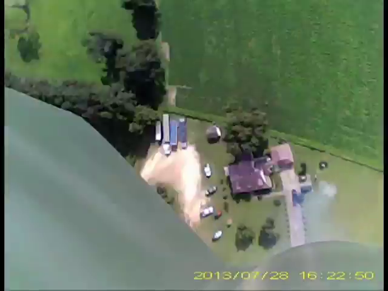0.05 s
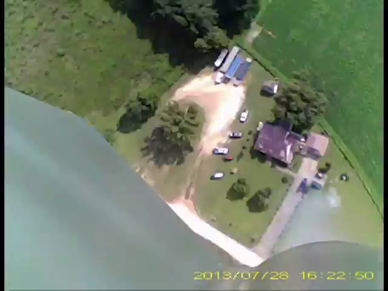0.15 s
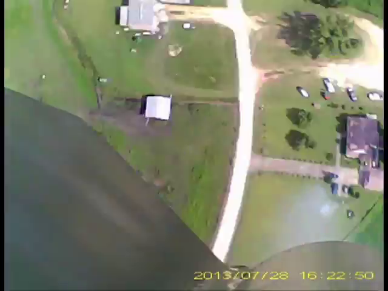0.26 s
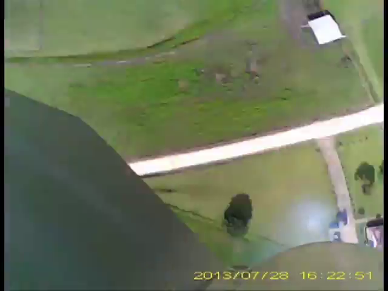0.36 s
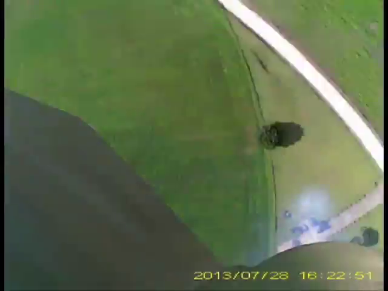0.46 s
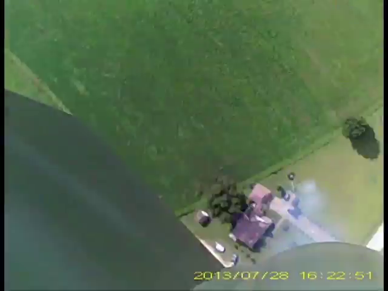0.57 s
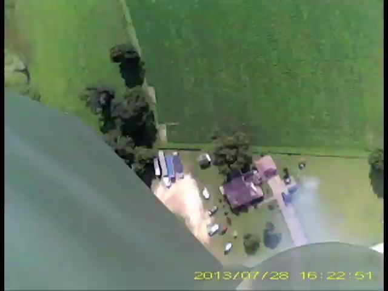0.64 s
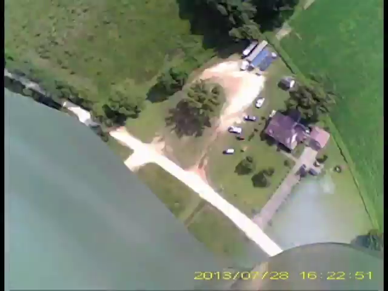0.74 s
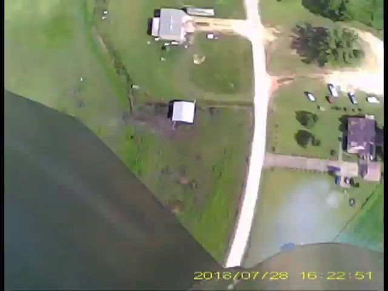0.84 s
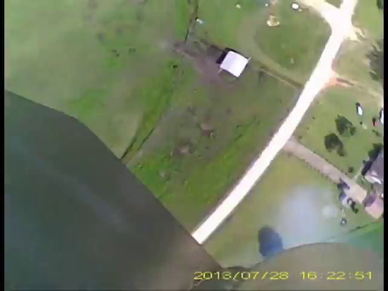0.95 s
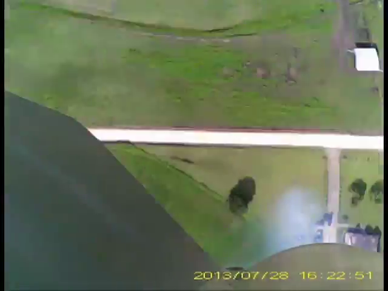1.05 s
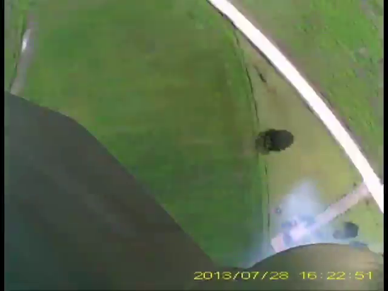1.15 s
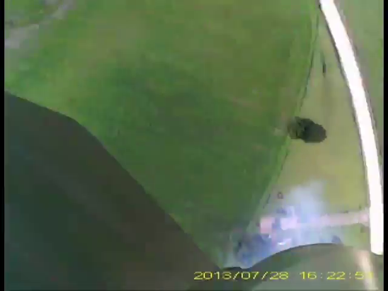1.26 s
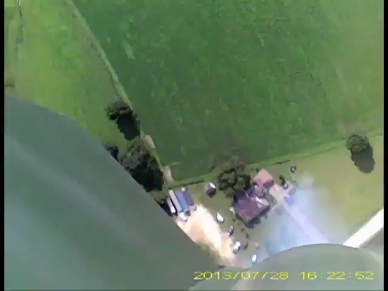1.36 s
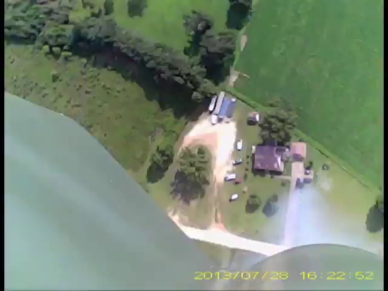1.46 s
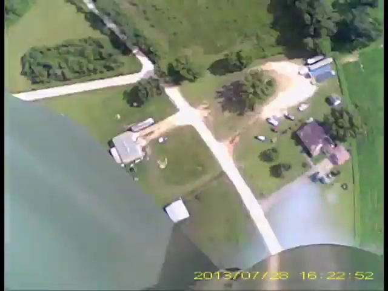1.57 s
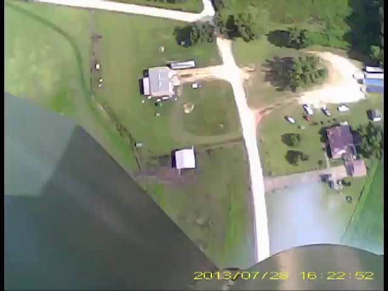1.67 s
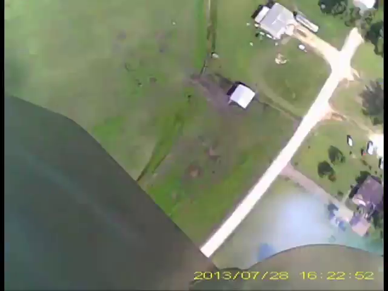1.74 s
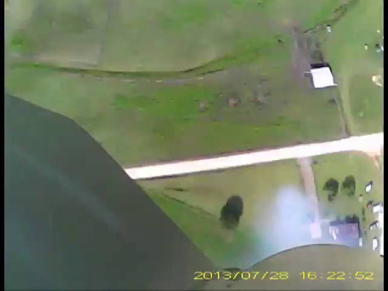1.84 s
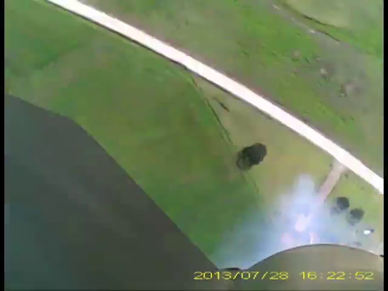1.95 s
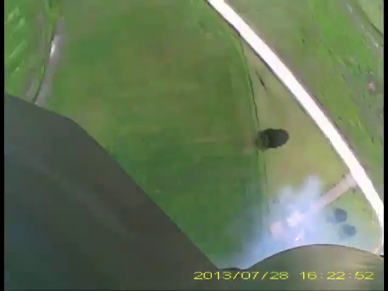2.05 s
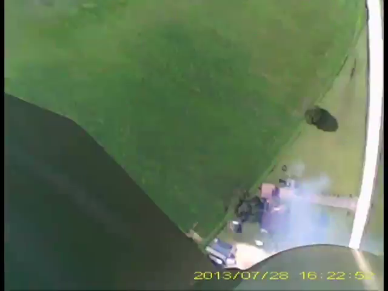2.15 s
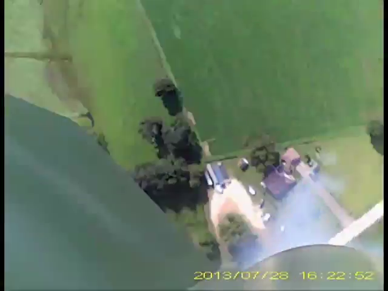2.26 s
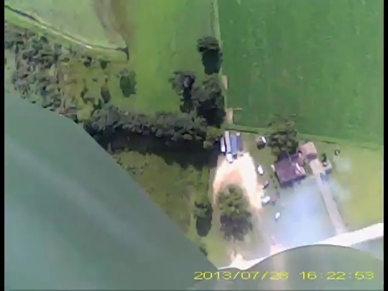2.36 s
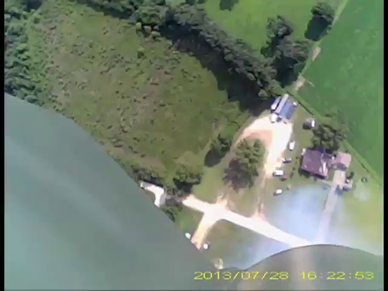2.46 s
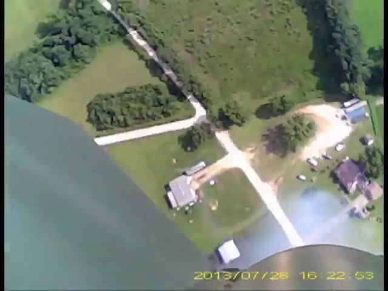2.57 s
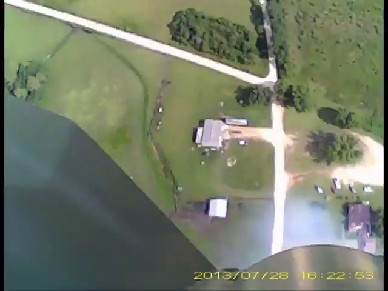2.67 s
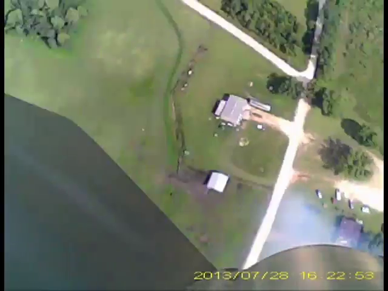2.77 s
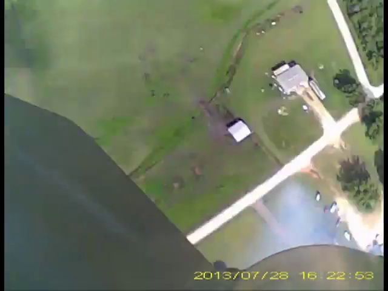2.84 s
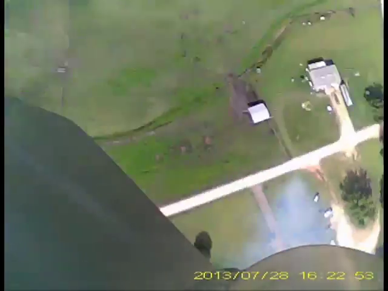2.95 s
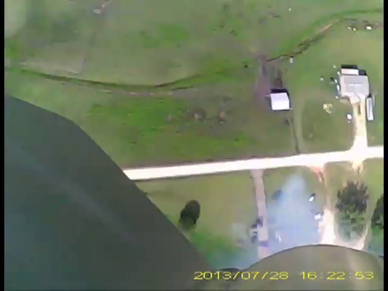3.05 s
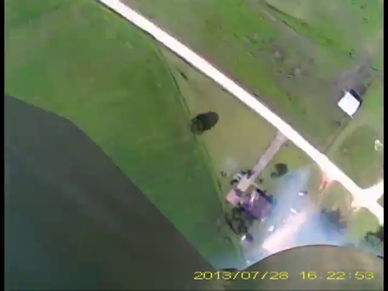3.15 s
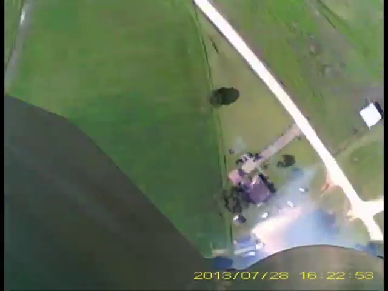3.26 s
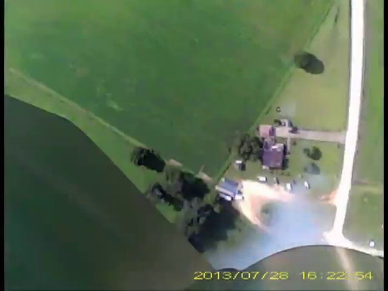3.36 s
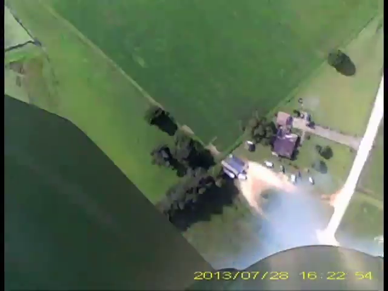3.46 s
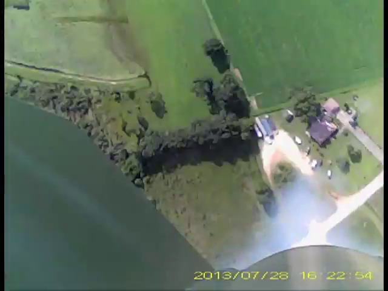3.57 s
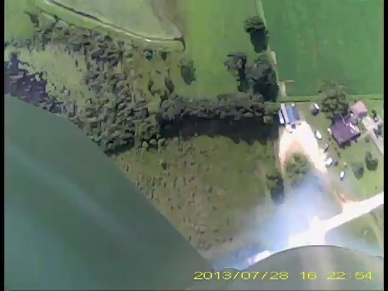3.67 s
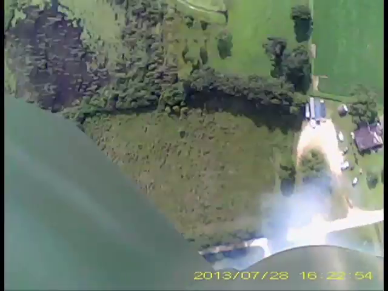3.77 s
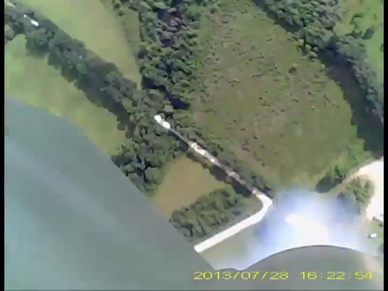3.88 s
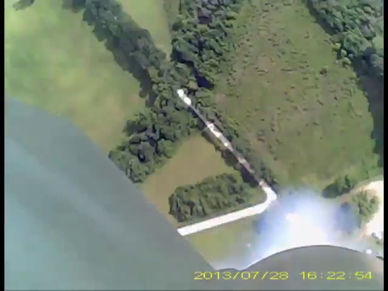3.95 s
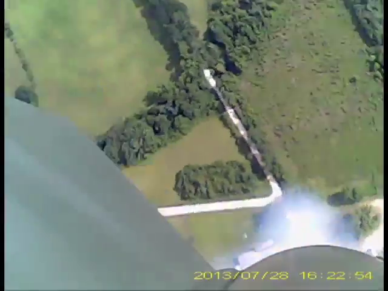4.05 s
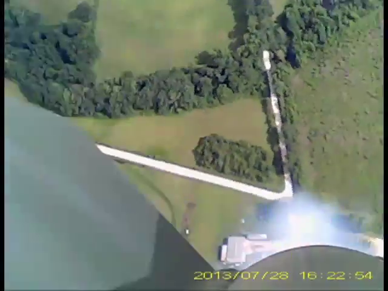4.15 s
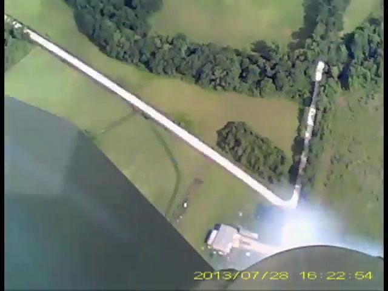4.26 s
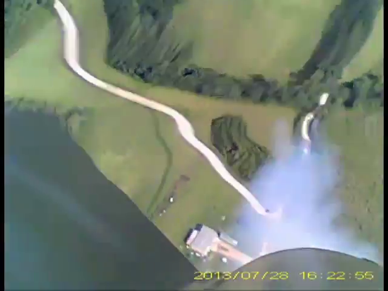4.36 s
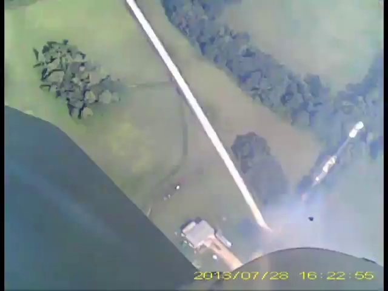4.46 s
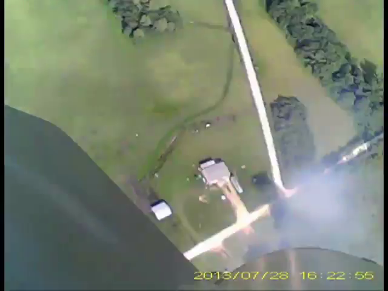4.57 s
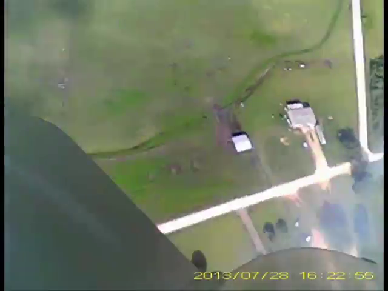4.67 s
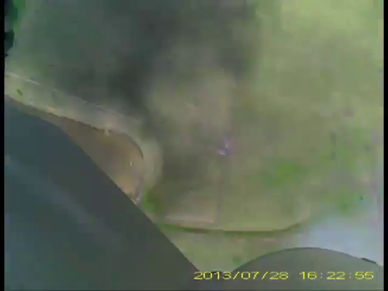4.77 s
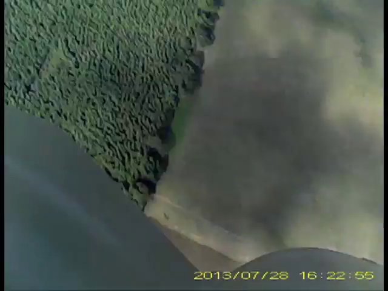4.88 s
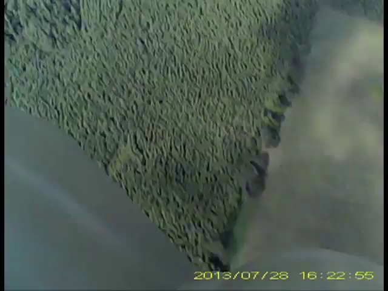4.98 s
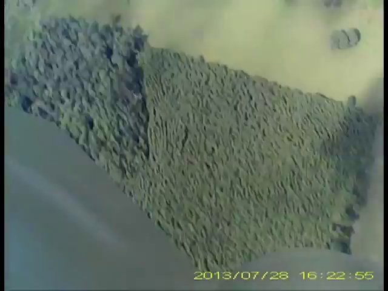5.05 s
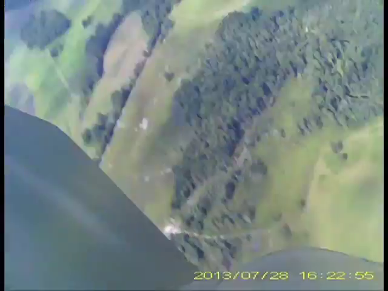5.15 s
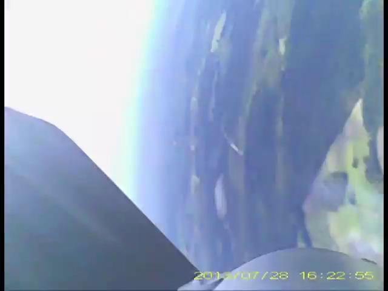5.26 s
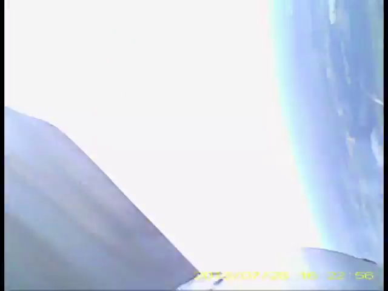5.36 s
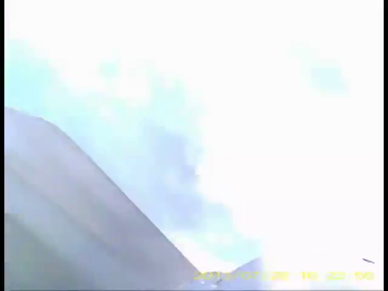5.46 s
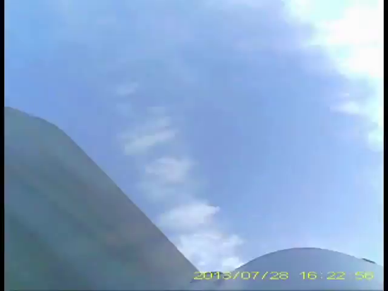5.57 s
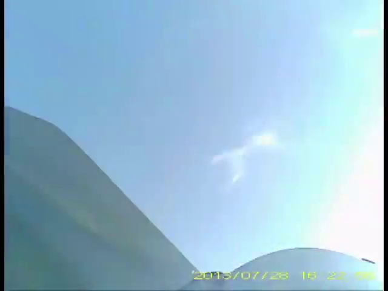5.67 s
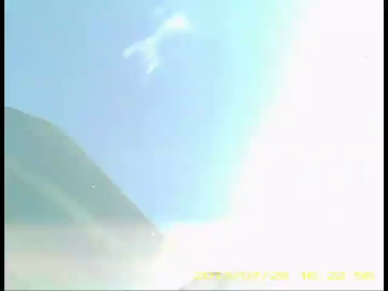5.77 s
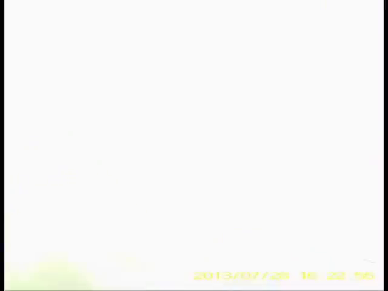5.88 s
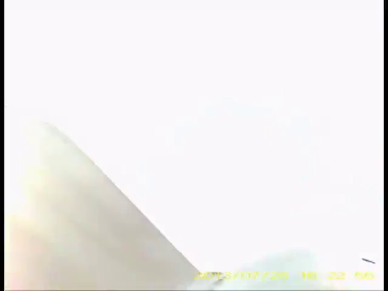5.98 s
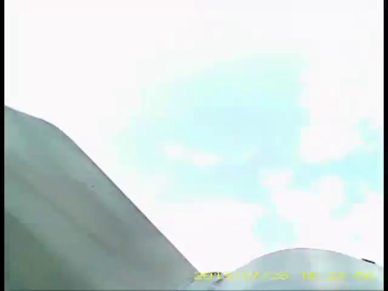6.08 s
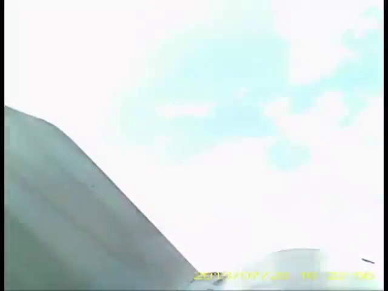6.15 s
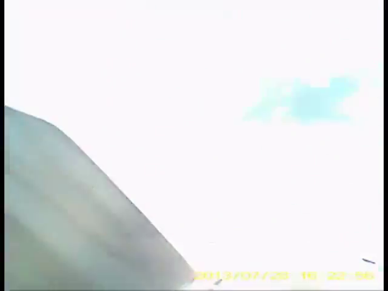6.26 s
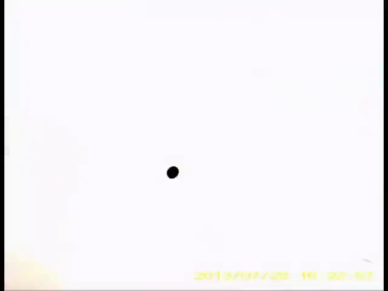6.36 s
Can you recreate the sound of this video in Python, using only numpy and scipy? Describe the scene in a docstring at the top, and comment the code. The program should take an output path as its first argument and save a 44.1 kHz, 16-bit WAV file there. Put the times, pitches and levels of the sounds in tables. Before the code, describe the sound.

A harsh, steady rush of wind overloads a tiny microphone riding a model rocket through open air, with low buffeting and a hollow whoosh that sinks as the rocket slows. The rush turns choppy, with short surges and several thumps. Near the end it falls to faint puffs of wind, leaving brief close rattles from the housing and one bright click.

```python
"""On the side of a climbing model rocket, turbulent air overloads a small camera's microphone.
Eddies behind the housing moan and whoosh, falling in pitch as the rocket slows, and the shell buzzes
faintly. As the rocket tips over, the rush breaks into gusts and thumps, the housing rattles in its
resonant modes, and something loose flicks the microphone port."""
import sys
import numpy as np
from scipy import signal
from scipy.fft import rfft, irfft
from scipy.io import wavfile
from scipy.ndimage import uniform_filter1d

SR = 44100
rng = np.random.default_rng(int(sys.argv[2]) if len(sys.argv) > 2 else 0)


def to_wav(sig):
    """Store sig (one row per channel, or 1-D mono) as 16-bit WAV at the path in sys.argv[1].

    Samples outside -1..1 are clipped; the rate is SR.
    """
    pcm = np.clip(np.atleast_2d(sig), -1, 1) * 32767
    pcm = np.round(pcm).astype(np.int16)
    wavfile.write(sys.argv[1], SR, pcm.T)  # frames by channels


N = 283122


def gain_of(db):
    """The decibel law: 20 dB is a factor of ten in amplitude."""
    return 10 ** (np.asarray(db) / 20)


def unit_rms(x):
    """Normalisation to a mean power of one."""
    return x / np.sqrt(np.mean(x ** 2) + 1e-20)


def spectrum_db(points, hz):
    """Interpolation of a spectrum along a logarithmic frequency axis."""
    point_hz, db = np.transpose(points)
    return np.interp(np.log(hz + 1), np.log(point_hz + 1), db)


def curves(rows):
    """Linear interpolation in time: one curve for each column after the first."""
    times, *columns = np.transpose(rows)
    return [np.interp(np.arange(N) / SR, times, column) for column in columns]


def swell(seconds, rise):
    """A skewed half-sine envelope; rise is the share of its length spent rising."""
    progress = np.arange(0, 1, 1 / (max(seconds, .002) * SR))
    return np.sin(np.pi * np.interp(progress, [0, rise, 1], [0, .5, 1]))


def add(mix, start_s, sound):
    """Superposition: a sound adds to the mix from its start time on."""
    part = mix[round(start_s * SR):][:len(sound)]
    part += sound[:len(part)]


def bumps(rows, rise):
    """Level modulation in dB: zero but for one swell a row."""
    out = np.zeros(N)
    for start_s, rise_db, seconds in rows:
        add(out, start_s, rise_db * swell(seconds, rise))
    return out


def flutter(top_hz):
    """Random modulation: band-limited noise of unit RMS, from 3 Hz to about top_hz."""
    hz = np.fft.rfftfreq(N, 1 / SR)
    band = 1 / ((1 + (hz / top_hz) ** 4) * (1 + (3 / (hz + 1e-3)) ** 4))
    noise = rng.standard_normal(len(hz)) + 1j * rng.standard_normal(len(hz))
    return unit_rms(irfft(band * noise, N))


def resonate(x, hz, width_hz):
    """Resonance by heterodyning: shift hz, steady or sliding, to zero, smooth, and shift back."""
    carrier = np.exp(2j * np.pi * np.cumsum(hz * np.ones(len(x))) / SR)
    pole = np.exp(-np.pi * width_hz / SR)
    return 2 * (carrier * signal.lfilter([1 - pole], [1, -pole], x / carrier + 1e-18)).real


def flight():
    """Eddy shedding follows airspeed: it slows with the rocket and quickens as it tips across the wind."""
    # Each row: time in seconds, shedding frequency in Hz, whoosh level in dB.
    shedding = [(0, 172.7, -22), (1.4, 164, -3), (2.6, 128, -1), (4, 79, -5), (4.3, 73, -13),
                (4.55, 68.6, -12), (4.65, 117, -8.5), (5.05, 105, -12.5), (5.12, 90, -60)]
    tip_start_s, tip_length_s = 4.55, .15
    hz, whoosh_db = curves(shedding)
    octaves_lost = np.log2(hz[0] / hz)
    tipped = np.clip((np.arange(N) / SR - tip_start_s) / tip_length_s, 0, 1)
    return hz, octaves_lost, whoosh_db, tipped


def turbulence(spectrum, size, tilt_db, patchy_db):
    """Turbulent pressure is random: patchy noise of steady power, tilted by tilt_db per octave."""
    hop = size // 4
    frames, hz = N // hop + 5, np.fft.rfftfreq(size, 1 / SR)
    real, imaginary, patches = rng.standard_normal((frames, len(hz), 3)).T
    patches = uniform_filter1d(patches, size=5, axis=0)  # across frequency
    patches = unit_rms(uniform_filter1d(patches, size=9, axis=1))  # across time
    tilt_db = np.pad(tilt_db[::hop], (0, 5), "edge")[:frames]
    shape = gain_of(spectrum_db(spectrum, hz)[:, None] + np.outer(np.log2((hz + 20) / 1000), tilt_db))
    shape /= np.linalg.norm(shape, axis=0)
    spectra = (real + 1j * imaginary) * shape * gain_of(patchy_db * patches)
    return unit_rms(signal.istft(spectra, nperseg=size, noverlap=size - hop)[1][:N])


def airflow():
    """Turbulence at the microphone port: a broad rush and a low buffeting, both modulated by gusts."""
    # Each row: time in seconds, rush level in dB, buffeting level in dB, rush tilt in dB per octave.
    air = [(0, 8.5, -0.5, 1.5), (1, 6.5, -3.5, 1), (2.6, 5.5, -7, .5), (3.6, 4.5, -7.5, 0),
           (4.2, 0, -5.5, 1), (4.33, -9, -3.5, 0.5), (4.58, -4, -4.5, -1), (4.75, -1, -17.5, -3),
           (5.085, -10.5, -14, -3), (5.1, -14.5, -7.5, -5.5), (5.19, -18.5, -14, -6),
           (5.25, -16, -19, -5.5), (5.34, -20.5, -14, -8), (5.41, -45.5, -28, -2), (5.72, -49, -32.5, -1),
           (5.86, -40.5, -33, 3.5), (5.93, -39, -45, 3.5), (6.08, -42.5, -51, -3.5), (6.19, -45, -35, -2.5),
           (6.3, -30.5, -26, -7.5), (6.42, -40, -22, 0)]
    # Spectra ahead of the amplifier. Each row: frequency in Hz, relative spectral density in dB.
    rush_spectrum = [(30, -43), (200, -16.5), (500, -1), (1000, -1.5), (1600, -2.5), (2000, -3),
                     (2400, -9.5), (3300, -16), (4200, -15.5), (4800, -25.5), (5500, -45.5), (7000, -33),
                     (11000, -37.5)]
    buffet_spectrum = [(10, -15.5), (40, 2), (100, 1.5), (250, 2), (450, -2), (800, -24), (2000, -35.5),
                       (11000, -103.5)]
    # Brief surges brighten the rush; later, slower puffs dull it.
    # Each row: start in seconds, rise of the rush in dB, length in seconds.
    surges = [(4.232, 10.5, 0.076), (4.344, 5.5, 0.026), (4.39, 2, 0.017), (4.427, 6.5, .022),
              (4.473, 4.5, 0.017), (4.914, 6, 0.014), (4.975, 8.5, .022), (5.015, 6.5, .018),
              (5.045, 2.5, 0.055), (5.107, 8, 0.018), (5.186, 8, 0.011), (5.232, 4.5, 0.043),
              (5.278, 6, 0.03), (5.333, 4, .018)]
    puffs = [(5.43, 10, 0.048), (5.54, 12.5, .11), (6.09, 11, 0.096)]
    rush_db, buffet_db, bright_db = curves(air)
    spread_db = np.where(np.arange(N) / SR > 4.5, 2, 0.23)  # steps up as the flight turns unsteady
    wobble_db = spread_db * flutter(top_hz=40)
    puffs_db = bumps(puffs, rise=0.48)
    gusts_db = wobble_db + bumps(surges, rise=0.46)
    lumps_db = 0.67 * wobble_db + 0.48 * spread_db * flutter(top_hz=30) + 0.82 * puffs_db
    _, octaves_lost, _, tipped = flight()
    rush_tilt = bright_db + 0.039 * gusts_db - 0.42 * puffs_db
    # The buffeting brightens as the eddies slow and turns dull once the rocket has tipped.
    buffet_tilt = (1 - tipped) * (4.5 * octaves_lost - 0.5) - 3 * tipped
    rush = turbulence(rush_spectrum, size=256, tilt_db=rush_tilt, patchy_db=-1.0)
    buffet = turbulence(buffet_spectrum, size=2048, tilt_db=buffet_tilt, patchy_db=1.5)
    return gain_of(rush_db + gusts_db + puffs_db) * rush + gain_of(buffet_db + lumps_db) * buffet


def eddies():
    """Vortex shedding: a low moan until the tip-over, and a broad whoosh from a smaller edge."""
    moan_db, fall_db_per_octave = -8, 4
    hz, octaves_lost, whoosh_db, tipped = flight()
    moan_noise, whoosh_noise = rng.standard_normal((2, N))
    wavering_hz = hz * (1 + 0.065 * flutter(top_hz=13.0))
    moan = unit_rms(resonate(resonate(moan_noise, wavering_hz, 36), wavering_hz, 35))
    moan *= gain_of(2.5 * flutter(top_hz=9.6))
    moan *= gain_of(moan_db - fall_db_per_octave * octaves_lost) * (1 - tipped)
    whoosh = unit_rms(resonate(resonate(whoosh_noise, 8 * hz, 600), 8 * hz, 600))
    return moan + gain_of(whoosh_db) * whoosh


def housing(drive, treble_db):
    """Modal response of the shell; harder contact feeds the upper modes, by treble_db per octave."""
    # Each row: frequency in Hz, bandwidth of each of two filter stages in Hz, relative level in dB.
    modes = [(453, 180, -2.5), (697, 83, -5.5), (1140, 530, -0.5), (1644, 220, 1), (1924, 220, -4),
             (2700, 1100, -18), (3600, 900, -16.5), (4300, 380, -11.5), (4880, 410, -23),
             (7500, 1500, -43.5), (6000, 5000, -36)]
    out = np.zeros(len(drive))
    for k, (hz, width_hz, db) in enumerate(modes):
        ring = resonate(resonate(drive, hz, width_hz), hz, width_hz) / np.sqrt(width_hz)
        out += (-1) ** k * gain_of(db + treble_db * np.log2(hz / 1600)) * ring
    return out


def buzz():
    """Forced vibration: steady noise drives the shell's modes in a faint, uneven buzz."""
    level_db = -53 + 2.1 * flutter(top_hz=30)
    return gain_of(level_db) * unit_rms(housing(rng.standard_normal(N), treble_db=5.0))


def thumps():
    """Pressure pulses: a single gust hitting the port makes a wave packet of a few swings."""
    # Each row: start in seconds, envelope peak in dB, frequency in Hz, number of cycles.
    gusts = [(4.321, 2.5, 150, 2.6), (4.985, -9, 130, 1.3), (5.141, -13, 120, 1.3), (5.178, 4.5, 230, 1.7),
             (5.188, -5, 59.7, .95), (5.219, 11, 300, 1.4), (5.329, 1, 200, 1.05), (5.34, -14, 130, 2),
             (5.441, -13, 130, 1.3), (5.452, -6.5, 167, 1.8), (5.457, -13.5, 600, 1.3),
             (5.537, -17, 700, 1.5), (5.623, -11.5, 600, 1.1), (6.334, -2.5, 238, 2.1),
             (6.335, -6.5, 453, 4.9), (6.346, -18, 35, 1), (6.376, -18, 160, 3)]
    out = np.zeros(N)
    for start_s, db, hz, cycles in gusts:
        push = swell(cycles / hz, rise=.45)
        swing = np.sin(2 * np.pi * hz * np.arange(len(push)) / SR)
        add(out, start_s, -gain_of(db) * push * swing)
    return out


def rattles():
    """Contact excitation: the housing scrapes and rattles as bursts of gritty noise ring its modes."""
    # Each row: start in seconds, level in dB, length in seconds, treble tilt in dB per octave.
    contacts = [(5.445, -32, 0.024, -2), (5.494, -37, 0.022, 1), (5.546, -21.5, 0.034, -8.5),
                (5.602, -24, .02, -9), (5.838, -22.5, 0.02, 1), (5.852, -13.5, .014, 1),
                (5.88, -35, .016, 3), (5.925, -20, 0.033, 1.5), (5.954, -27.5, .022, 6),
                (5.977, -25.5, 0.046, 1), (6.012, -40, .012, -4), (6.091, -29, 0.053, -0.5),
                (6.202, -42, .018, 2.5), (6.271, -30, .025, -3), (6.302, -34, .04, -6),
                (6.33, -19.5, 0.017, -7), (6.371, -24, 0.02, -2)]
    out = np.zeros(N)
    for start_s, db, seconds, treble_db in contacts:
        grit = rng.standard_normal(SR // 8)
        force = swell(seconds, rise=.42) ** 1.6
        ring = housing(grit * np.pad(force, (0, len(grit) - len(force))), treble_db)
        ring *= np.linalg.norm(force) / np.linalg.norm(ring)  # same energy as the envelope
        add(out, start_s, gain_of(db) * ring)
    return out


def snap():
    """An impact transient: something loose flicks the port with a short, bright tick."""
    # One row: start in seconds, level in dB, length in seconds.
    flick = (6.371, -23, .013)
    # Each row: frequency in Hz, relative spectral density in dB.
    tick_spectrum = [(500, -14), (1000, -8), (2200, 0), (3500, -2), (5000, -8), (6200, -16), (7500, -9),
                     (11000, -27)]
    start_s, db, seconds = flick
    colour = gain_of(spectrum_db(tick_spectrum, np.fft.rfftfreq(2048, 1 / SR)))
    noise = unit_rms(irfft(rfft(rng.standard_normal(2048)) * colour))
    push = swell(seconds, rise=.08)
    out = np.zeros(N)
    add(out, start_s, gain_of(db) * push * noise[:len(push)])
    return out


def scene():
    """Superposition of air and housing sounds at the microphone, in one channel."""
    return (airflow() + eddies() + buzz() + thumps() + rattles() + snap())[None]


def record(dry):
    """Saturation: the amplifier hits its rails, filters round the flat tops, and the converter aliases."""
    rail, knee, hiss_db = 0.76, 3.02, -57
    smooth_hz, shelf_start_hz, shelf_end_hz, band_edge_hz = 1437, 3990, 9200, 11150
    clipped = dry / (1 + abs(dry / rail) ** knee) ** (1 / knee)
    noisy = clipped + gain_of(hiss_db) * rng.standard_normal(dry.shape)
    pole, shelf_pole, zero = np.exp(-2 * np.pi * np.array([smooth_hz, shelf_start_hz, shelf_end_hz]) / SR)
    rounded = signal.lfilter([1 - pole], [1, -pole], noisy)
    shelved = signal.lfilter([1, -zero], [1, -shelf_pole], rounded) * (1 - shelf_pole) / (1 - zero)
    aliased = shelved * (1 + (-1) ** np.arange(N))  # keeping every second sample folds the top back
    band_limit = signal.firwin(255, band_edge_hz, window=("kaiser", 9), fs=SR)
    return signal.oaconvolve(aliased, band_limit[None], "same")


dry = scene()
out = record(dry)
to_wav(out)
```